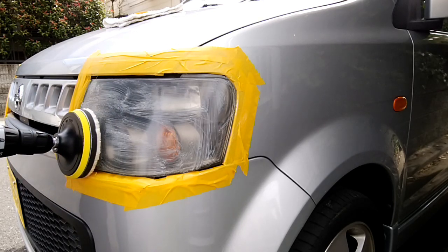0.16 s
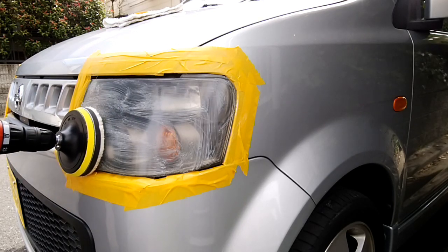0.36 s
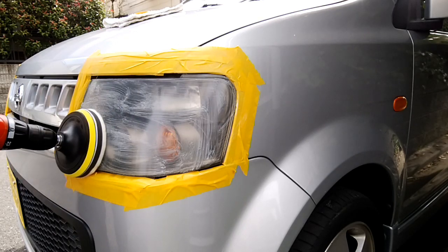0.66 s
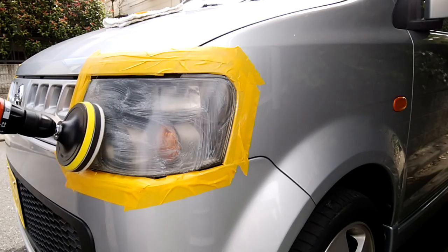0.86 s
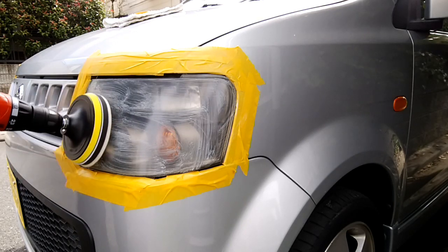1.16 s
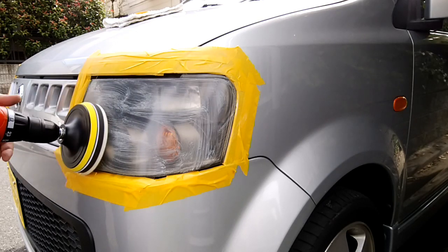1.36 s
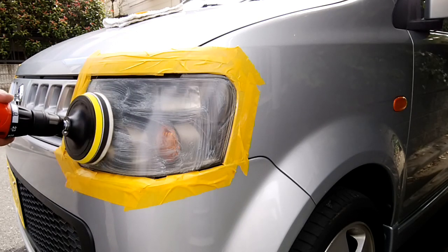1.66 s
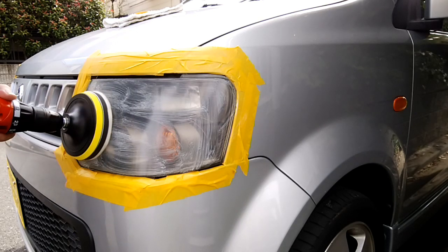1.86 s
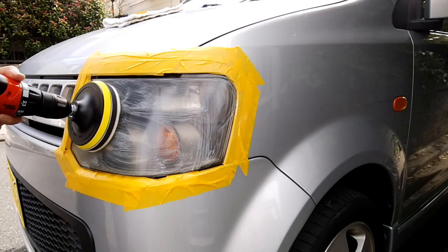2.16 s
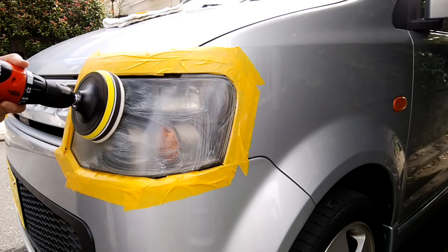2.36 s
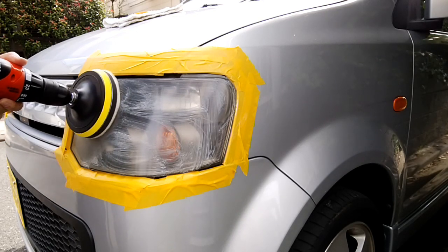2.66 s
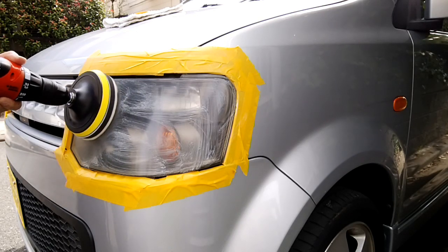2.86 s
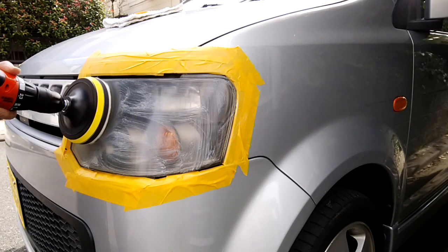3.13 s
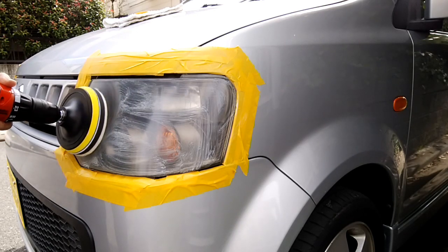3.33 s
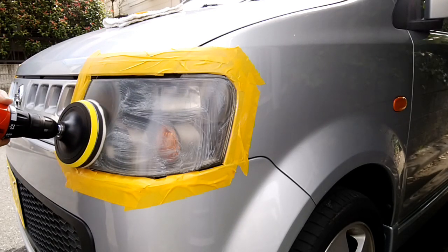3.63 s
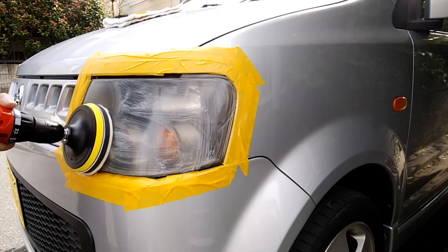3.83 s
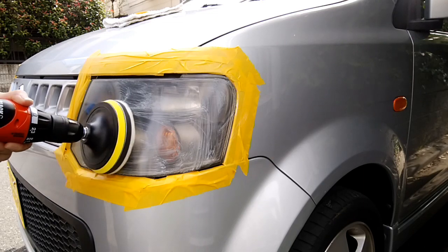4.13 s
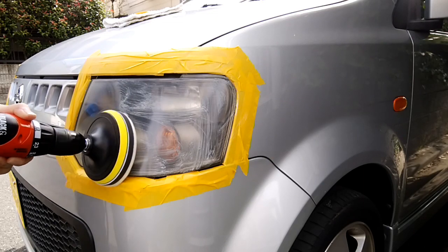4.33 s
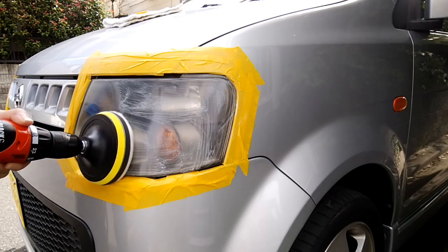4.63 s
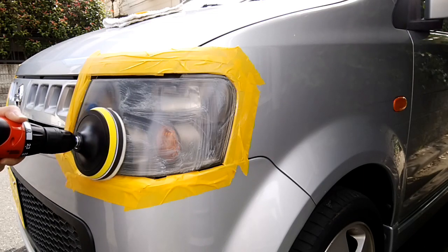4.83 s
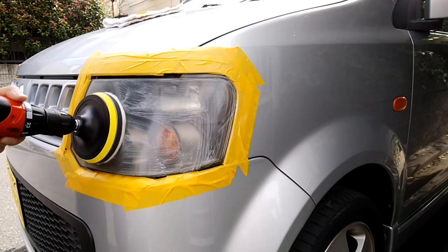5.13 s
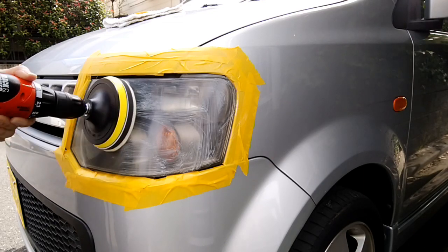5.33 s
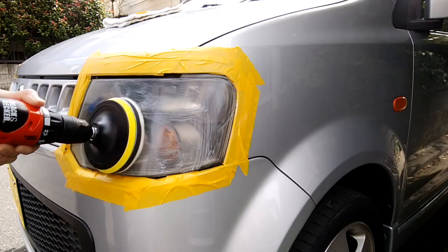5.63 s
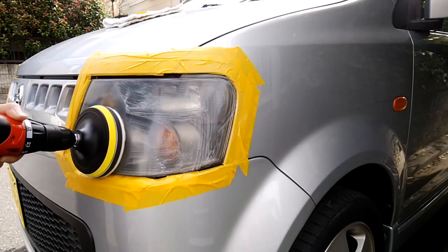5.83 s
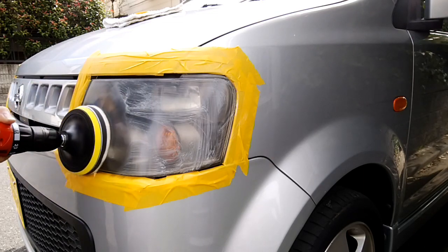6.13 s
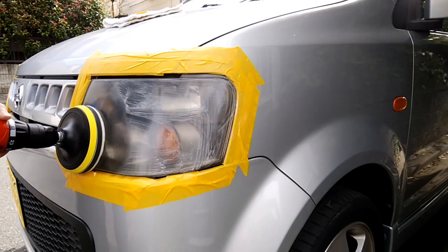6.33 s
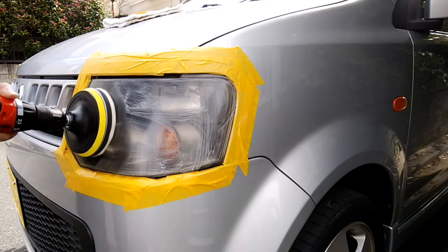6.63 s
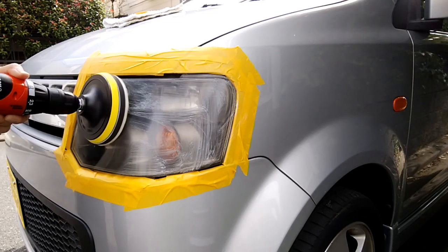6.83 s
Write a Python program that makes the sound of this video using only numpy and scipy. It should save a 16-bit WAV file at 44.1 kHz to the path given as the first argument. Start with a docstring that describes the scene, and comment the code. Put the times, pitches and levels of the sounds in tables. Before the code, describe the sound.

Close to a car in a quiet yard, a small bird whistles thinly and a faint tick is heard. A dull plastic trigger knock follows, then the drill creeps and quickly runs up to a bright, rattling whine. Foam hisses against the headlight, pulsing with each pad turn. The pitch settles slightly lower as the pad drags, and the motor keeps running to the end. Close microphone, same in both channels.

```python
"""Outdoors in a yard, close to a car: a cordless drill turns a foam polishing pad on a plastic headlight.
A small bird whistles (gliding tones), something ticks (a noise burst), the trigger knocks (decaying handle modes).
The motor creeps, runs up and labours under the pad: its angle drives whining, rattling gears, which throb once
per pad turn. Shaped noise makes the rubbing foam, ringing chuck, brushes and fan; a tone at motor speed, the hum."""
import sys
import numpy as np
from scipy import signal
from scipy.fft import rfft, irfft, next_fast_len
from scipy.io import wavfile
from scipy.ndimage import uniform_filter1d, map_coordinates

SR = 44100
rng = np.random.default_rng(int(sys.argv[2]) if len(sys.argv) > 2 else 0)


def put_to_file(sound):
    """Save the sound as 16-bit audio at rate SR, in the file named by the first command-line argument."""
    columns = np.atleast_2d(sound).T  # one column per channel
    safe = np.clip(columns, -1, 1)
    whole_steps = np.round(safe * 32767)
    wavfile.write(sys.argv[1], SR, whole_steps.astype(np.int16))


N = 308114
TIME = np.arange(N) / SR

MESH_ORDER = 1 / .1762  # tooth meshes per motor turn
USUAL_HZ = 345  # motor speed at which the levels of the parts hold
FULL_TRIGGER_S = .655

# working speed of the motor, sinking as the pad drags: t/s, f/Hz (turns per second)
WORKING_SPEED = [(1.0, 404), (1.15, 415), (1.45, 401), (1.85, 397), (2.1, 369), (2.6, 364), (2.68, 352),
                 (3.0, 351), (3.7, 335), (4.13, 339), (4.2, 327), (4.75, 332), (5.33, 350), (5.57, 336),
                 (5.76, 346), (6.2, 342), (6.38, 334), (6.99, 333)]
# how hard the hand presses the pad on: t/s, level/dB
HAND_PRESSURE = [(.8, -2.5), (1.0, 0), (1.2, -1.1), (1.65, -0.9), (2.1, -0.1), (3.3, 0.5), (3.9, 0.3),
                 (4.35, -0.5), (4.85, 1), (5.25, 0.9), (5.55, -1), (5.75, 1.5), (5.9, -0.8), (6.05, -3),
                 (6.5, -3), (6.99, -8)]
# treble of brushes, fan and rubbing, lower in the last two seconds: t/s, level/dB
TREBLE_LEVEL = [(2, 1), (3.05, 2), (3.7, 1.5), (4.5, 1.2), (4.9, 1), (5.05, -5.3), (5.28, -5.5), (5.52, -2),
                (5.75, -4), (6.1, -5), (6.99, -4.5)]


def undb(db):
    """Decibel definition: amplitude ratio 10^(dB/20)."""
    return 10 ** (np.asarray(db) / 20)


def unit(x):
    """Normalization by the root mean square, to rms 1."""
    return x / np.sqrt(np.mean(x ** 2))


def curve(table, order=1):
    """Linear interpolation in time of one column of a table."""
    rows = np.array(table)
    return np.interp(TIME, rows[:, 0], rows[:, order])


def noise():
    """White Gaussian noise: equal mean power at all frequencies."""
    return rng.standard_normal(N)


def walk(rate):
    """Low-pass random modulation: about `rate` smoothed changes a second, rms 1."""
    k = max(int(SR / rate), 2)
    steps = np.repeat(rng.standard_normal(N // k + 1), k)
    return unit(uniform_filter1d(steps, k)[:N])


def ring(hz, centre, width):
    """Lorentzian resonance: 1 at its centre, one half at half the width away, 0 far off."""
    return 1 / (1 + (2 * (hz - centre) / width) ** 2)


def colour(x, spectrum, modes=()):
    """Linear filtering: a broad spectral envelope with resonances on top, scaled to rms 1."""
    size = next_fast_len(N)
    f = np.arange(size // 2 + 1) * SR / size + 1  # 1 Hz up, to keep the logarithm finite
    hz, db = np.transpose(spectrum)
    shape = np.interp(np.log(f), np.log(hz), db)
    for centre, width, lift in modes:
        shape = shape + lift * ring(f, centre, width)
    return unit(irfft(rfft(x, size) * undb(shape), size)[:N])


def cycle(turns):
    """Harmonic oscillation: cosine of a phase given in turns."""
    return np.cos(2 * np.pi * turns)


def impacts(turns):
    """Impulsive excitation: one click of random strength and sign per turn, rms 1."""
    at = np.flatnonzero(np.diff(np.floor(turns)) > 0)
    clicks = np.zeros(N)
    clicks[at] = rng.standard_normal(len(at))
    return unit(clicks)


def fade(start, decay):
    """Exponential decay: an envelope that starts at once and dies away."""
    return (TIME >= start) * np.exp(-np.maximum(TIME - start, 0) / decay)


def scatter(x, decay):
    """Diffuse reflection: convolution with a short, decaying noise tail."""
    tail = rng.standard_normal(SR // 2) * np.exp(-TIME[:SR // 2] / decay)
    return signal.fftconvolve(x, tail / np.linalg.norm(tail))[:N]


def outdoors():
    """Turbulent pressure: quiet open air as shaped noise, with a few low buffets on the microphone."""
    # open air: f/Hz, relative level/dB per Hz
    air = [(25, -41), (50, -6), (100, 3), (170, -10.5), (340, -11), (900, -21), (2000, -31.5), (4000, -38),
           (5600, -38), (6600, -32), (7900, -40), (9400, -37), (13200, -36), (15500, -40)]
    # buffets of air on the microphone: t/s, length/s, level/dB
    buffets = [(0.708, 0.049, -38), (0.9, 0.082, -36.5), (2.402, 0.2, -48), (3.563, 0.036, -35),
               (3.732, .05, -40)]
    # rumble of a buffet: f/Hz, relative level/dB per Hz
    rumble = [(15, -55), (30, -31), (45, -15), (65, -3), (82, 3), (102, 4), (135, -11), (200, -14),
              (400, -15), (1500, -55)]
    air_db = -53.5
    gusts = sum(undb(db) * np.exp(-((TIME - at) / length) ** 2) for at, length, db in buffets)
    return undb(air_db + walk(5)) * colour(noise(), air) + gusts * colour(noise(), rumble)


def bird():
    """Frequency modulation: thin, gliding, wavering whistles with an octave, scattered by a hedge."""
    # notes: start t/s, end t/s, start f/Hz, end f/Hz, level/dB
    notes = [(-.06, 0.13, 4450, 4360, -58.5), (.12, 0.29, 4690, 4730, -59)]
    octave_db, hedge_db, hedge_decay_s = -20, -3.5, .03
    out = np.zeros(N)
    for start, end, from_hz, to_hz, db in notes:
        along = np.clip((TIME - start) / (end - start), 0, 1)
        turns = np.cumsum(from_hz + (to_hz - from_hz) * along) / SR
        turns = turns + .17 * walk(400)
        envelope = np.sin(np.pi * along) * (1 + 0.54 * walk(152))
        whistle = cycle(turns) + undb(octave_db) * cycle(2 * turns)
        out += undb(db) * envelope * whistle
    return out + undb(hedge_db) * scatter(out, hedge_decay_s)


def tick():
    """Transient: one faint, bright noise burst with exponential decay, before the drill starts."""
    # f/Hz, relative level/dB per Hz
    tick_band = [(4500, -25), (6000, 0), (7200, 0), (8000, -7), (9300, -3), (11000, -10), (15000, -16)]
    start_s, decay_s, level_db = .163, .012, -54
    return undb(level_db) * fade(start_s, decay_s) * colour(noise(), tick_band)


def trigger():
    """Modal excitation: a dull plastic knock rings the handle and leaves a diffuse echo in the yard."""
    # knock and its rebounds: t/s, peak level/dB before colouring
    knocks = [(0.3162, -15.5), (0.3175, -24), (0.325, -30), (.3342, -28)]
    # modes of the drill handle: f/Hz, relative level/dB, t60/s
    handle_modes = [(457, -20, 0.11), (610, -11, 0.083), (760, -1, 0.0097), (1100, 8, 0.017),
                    (1440, -2, 0.019), (2780, -8, 0.038)]
    # colouring of the knock: f/Hz, relative level/dB
    knock_colour = [(150, -26), (450, 9), (1600, 1), (2200, -12), (4500, -14), (7000, 7), (14000, -1)]
    # echo from the yard: f/Hz, relative level/dB per Hz
    yard = [(150, -20), (400, 7), (1500, -3), (2300, -15), (5000, -26), (7000, -22), (14000, -27)]
    yard_db, yard_decay_s = -45.5, 0.067
    out = np.zeros(N)
    for start, db in knocks:
        age = np.maximum(TIME[:SR] - start, 0)
        ringing = 0
        for hz, gain, t60 in handle_modes:
            ringing = ringing + undb(gain - 60 * age / t60) * np.sin(2 * np.pi * hz * age)
        out[:SR] -= undb(db) * ringing / np.abs(ringing).max()
    out = colour(out, knock_colour) * out.std()  # new spectrum, same overall level
    echo = undb(yard_db) * fade(knocks[0][0], yard_decay_s) * colour(noise(), yard)
    return out + echo


def motor_speed():
    """Relaxation to equilibrium: creep on a half-pulled trigger, then a quick run-up to working speed."""
    creep_hz, run_up_s, shape = 115, .08, .65  # stretched exponential
    age = np.maximum(TIME - FULL_TRIGGER_S, 0)
    remaining = np.exp(-(age / run_up_s) ** shape)
    return curve(WORKING_SPEED) + (creep_hz - curve(WORKING_SPEED)) * remaining


def grip():
    """Dry friction: brief grabs (+) and skips (-) of the pad, in dB."""
    # t/s, length/s, level/dB
    grips = [(0.75, .018, 2), (0.865, .024, 2.8), (0.922, 0.025, -3.5), (1.073, 0.031, -8),
             (1.592, 0.027, -8.5)]
    return sum(db * np.exp(-((TIME - at) / length) ** 2) for at, length, db in grips)


def pressure():
    """Normal force of the pad on the lens, in dB: the hand's push, with the grabs and skips."""
    return curve(HAND_PRESSURE) + grip()


def work_db(part, lag=.037):
    """Power-law radiation: one part's level in dB, from creep and run-up to speed and pad pressure."""
    engage_s, surge_decay_s = .009, 0.13  # the extra torque fades as the pad gathers speed
    db, creep_db, surge_db, per_speed, per_pressure = part
    age = TIME - FULL_TRIGGER_S - lag
    engaged = (1 + np.tanh(age / engage_s / 2)) / 2
    surge = engaged * np.exp(-np.maximum(age, 0) / surge_decay_s)
    speed_db = 20 * np.log10(curve(WORKING_SPEED) / USUAL_HZ)
    start_db = creep_db * (1 - engaged) + surge_db * surge
    return db + start_db + per_speed * speed_db + per_pressure * pressure()


# In each "part" below the columns are: level/dB, change while creeping/dB, lift in the run-up/dB,
# power of the speed, share of the pressure (dB per dB)


def slack_clunk():
    """Impact of backlash: a swell of noise as the gears take up their slack when the motor starts."""
    # f/Hz, relative level/dB per Hz
    clunk_band = [(60, -13), (130, -9), (180, -2), (260, -10), (350, -3), (480, -8), (620, -3), (800, -15),
                  (1400, -15), (3000, -46)]
    envelope = np.exp(-np.abs(TIME - .555) / 0.15)
    return undb(-32.5) * envelope * colour(noise(), clunk_band)


def rotor_hum(turns):
    """Centrifugal unbalance: a force once per motor turn, as the square of the speed, shakes the housing."""
    # strength of the hum, on top of the speed law: t/s, level/dB
    hum_level = [(.6, -42), (.78, -37.5), (1, -52), (1.6, -52), (2.3, -37), (2.9, -35.5), (3.5, -34),
                 (4.45, -41.5), (4.75, -34), (4.92, -30), (5.27, -31.5), (5.5, -41), (5.8, -30.5),
                 (6.02, -31.5), (6.25, -29), (6.6, -27), (6.99, -40.5)]
    unbalance = unit(motor_speed() ** 2)
    tone = np.sqrt(2) * cycle(turns + 0.1 * walk(40))
    return unbalance * tone * undb(curve(hum_level) + 2.35 * walk(22))


def fan():
    """Aerodynamic noise: turbulent air blown through the vents."""
    # f/Hz, relative level/dB per Hz
    fan_band = [(5000, -27.5), (5950, -32), (6250, 0.5), (6800, 1.5), (7100, -7), (7500, -15), (9000, -47)]
    fan_part = (-27, -19, -3, 1.2, 0.35)
    level_db = work_db(fan_part) + 1.1 * curve(TREBLE_LEVEL)
    return colour(noise(), fan_band) * undb(level_db + 1.3 * walk(70))


def brushes(turns, load):
    """Sliding friction: brush hiss, modulated by the passing commutator bars and by each motor turn."""
    # f/Hz, relative level/dB per Hz
    brush_band = [(1500, -23.5), (4500, -10), (7400, -7), (8000, -13.5), (9300, -10), (10300, -14.5),
                  (10800, -18.5), (11500, -16), (12300, -12.5), (13200, -9), (14300, -21.5), (15700, -20)]
    # resonances: f/Hz, width/Hz, lift/dB
    brush_modes = [(8450, 910, 5), (13120, 920, 5.8)]
    brush_part = (-26, -16.5, 0, -0.26, 0.08)
    commutator_bars = 6
    scrape = noise() * (1 + 0.057 * cycle(commutator_bars * turns) + 0.12 * cycle(turns))
    level_db = work_db(brush_part) + curve(TREBLE_LEVEL) + 0.033 * load
    return colour(scrape, brush_band, brush_modes) * undb(level_db + 0.75 * walk(120))


def pad(turns, speed, load):
    """Stick-slip friction: foam on the lens makes a dense stream of tiny releases, which ring the chuck."""
    # rubbing on the lens: f/Hz, relative level/dB per Hz
    lens = [(500, -25), (1600, -4.5), (2300, 0), (2800, 1), (3600, 1), (4100, -1.5), (4600, -9), (5200, -6),
            (6500, -40), (12000, -50)]
    # resonances of the lens: f/Hz, width/Hz, lift/dB
    lens_modes = [(2930, 130, 2.4), (3440, 160, 3.6)]
    # ringing chuck: f/Hz, relative level/dB per Hz
    chuck_band = [(4800, -51), (5350, -13), (5560, 5), (5820, -1.5), (6050, 3), (7000, -42)]
    rub_part, chuck_part = (-24.5, -18, 5, 0.4, 1.5), (-34, -11, 4, 0, 0.9)
    chuck_hz, chuck_width_hz, chuck_lift_db = 5515, 660, 4.5
    bite_share, bite_per_db = 0.023, 0.1868  # share of the load swing; its rise per dB of lighter pressure
    drag_db = (bite_share - bite_per_db * curve(HAND_PRESSURE)) * load
    slips = noise() * undb(1.05 * walk(1500) + 1.2 * walk(150)) * (1 + 0.13 * cycle(turns))
    # the rubbing follows a share of the treble's level
    rub_db = work_db(rub_part) + 0.34 * curve(TREBLE_LEVEL) + drag_db
    rub = colour(slips, lens, lens_modes) * undb(rub_db + 1.0 * walk(35))
    # the chuck rings most when the third multiple of the mesh meets its resonance
    lift_db = chuck_lift_db * ring(3 * MESH_ORDER * speed, chuck_hz, chuck_width_hz)
    chuck_db = work_db(chuck_part) + lift_db + drag_db
    chuck = colour(slips, chuck_band) * undb(chuck_db + 1.5 * walk(40))
    return rub + chuck


def gears(turns, speed, load):
    """Parametric excitation: meshing teeth sing and knock in the gearbox, harder when the pad drags."""
    # strength of the whine: t/s, level/dB
    whine_level = [(1, 1.5), (2.4, -2), (3.2, -0.5), (4.3, 1), (4.85, -3), (5.3, 3), (5.85, 0.5), (6.5, -1),
                   (6.99, -3.5)]
    # weaker motor and gear tones: multiple of the motor speed, relative level/dB
    weak_orders = [(.75, -48), (2.293, -44), (3, -42), (3.67, -40.5), (4.54, -41.5), (6.82, -41.5),
                   (8.1, -41.5), (8.6, -40.5), (9.08, -47), (10.2, -52)]
    # gearbox: f/Hz, relative level/dB per Hz
    gearbox = [(60, -39), (200, -59), (255, -5.5), (420, -5.5), (540, -11), (700, -4), (900, -1),
               (1200, -6), (1700, -1.5), (2200, -1.5), (2700, -5.5), (5000, -19)]
    # resonances of the gearbox: f/Hz, width/Hz, lift/dB
    gearbox_modes = [(306, 49, 1.7), (1037, 104, 8.5), (1302, 32, 6.5), (1485, 250, 11.9), (1646, 120, 4.3)]
    mesh_part, octave_part, rattle_part = (-27.5, -26, -2, 5.4, 0.28), (-31, -40, -3, 0.8, 0.1), (-24.5, -10, 5.5, 0.7, 0.68)
    case_hz, case_width_hz, case_lift_db = 3710, 81, 3.5  # upper ring of the gear case
    tooth_ring_hz, tooth_ring_width_hz, tooth_lift_db = 920, 41, 11  # its lower ring
    mesh_db_per_hz, rattle_db_per_hz = 0.18, 0.05  # torque slows the motor and drives the teeth harder
    slowed_hz = USUAL_HZ - curve(WORKING_SPEED)

    # the mesh is least regular while the pad gathers speed
    run_up = np.exp(-((TIME - .8) / 0.15) ** 2)
    mesh = turns * MESH_ORDER + (.04 + .18 * run_up) * walk(90) + .035 * walk(500)
    whine_db = work_db(mesh_part) + curve(whine_level) + mesh_db_per_hz * slowed_hz
    whine_db = whine_db + 1.2 * grip()  # a grab drives the teeth harder
    tone = undb(whine_db + load + 2.04 * walk(130)) * cycle(mesh)

    # the octave of the whine swells near the upper ring
    case_db = case_lift_db * ring(2 * MESH_ORDER * speed, case_hz, case_width_hz)
    octave_db = work_db(octave_part) + case_db + 0.032 * load
    backlash = .085 * walk(130)
    octave = undb(octave_db + 3.64 * walk(90)) * cycle(2 * mesh + backlash)

    # each weak tone swells while its pitch crosses the lower ring
    others = 0
    for order, db in weak_orders:
        lift_db = tooth_lift_db * ring(order * speed, tooth_ring_hz, tooth_ring_width_hz)
        wobbling = cycle(order * turns + 0.15 * walk(60))
        others = others + undb(db + lift_db + 2.96 * walk(35)) * wobbling

    # after the full pull the rattle comes up sooner than the other parts
    effort = undb(work_db(rattle_part, lag=0.0095) + rattle_db_per_hz * slowed_hz)
    knocks = impacts(mesh) * (1 + 0.085 * cycle(turns))
    rattle = colour(knocks, gearbox, gearbox_modes) * undb(0.045 * load + 1.2 * walk(30))
    tones = tone + octave + others * unit(effort * speed ** 2)
    return np.sqrt(2) * tones + effort * rattle


def wing_echo(x):
    """Comb filtering: the curved car wing mirrors the treble; as the hand moves, the ripples slide."""
    echo_s, echo_share = .0042, .28  # mean delay, amplitude share
    high_pass = signal.butter(2, 1800, "high", fs=SR, output="sos")
    treble = signal.sosfilt(high_pass, x)
    lag = echo_s * (1 + 0.033 * walk(2)) * SR  # in samples
    return x + echo_share * map_coordinates(treble, [np.arange(N) - lag], order=3)


def drill():
    """Coupled rotation: the pad slows the motor once a pad turn; its angle drives gears, pad, brushes, hum."""
    # where the pad bears hardest as the hand tilts it: t/s, angle/pad turns, scale of the load swing/dB
    tilt = [(0.85, 0.04, 1.1), (1.1, 0.82, 10.6), (1.25, 0.45, 3.1), (1.55, 0.43, 7.4), (2.0, 0.42, 0.9),
            (2.15, 0.85, 3.3), (2.95, 0.85, 4.4), (3.15, 1.45, 3.6), (4.2, 1.36, 3.9), (4.85, 1.24, 0.2),
            (5.4, 1.43, 5.4), (5.8, 1.46, 2.8), (6.4, 1.53, 7.3), (6.99, 1.2, 3.2)]
    start_s, gear_ratio = .523, 42.4
    # a fast, lightly loaded motor yields most
    sag_hz_per_db, sag_at_hz, sag_power = 1.5, 400, 4
    grip_hz_per_db = 1.4  # a grab slows the motor, a skip frees it
    steady = motor_speed()
    pad_angle = np.cumsum(steady) / SR / gear_ratio - curve(tilt)
    swing = curve(tilt, order=2)
    load = swing * (0.85 * cycle(pad_angle) - 0.13 * cycle(2 * pad_angle))
    sag = sag_hz_per_db * swing * (steady / sag_at_hz) ** sag_power
    speed = steady - sag * np.sin(2 * np.pi * pad_angle) - grip_hz_per_db * grip()
    turns = np.cumsum(speed) / SR
    running = np.clip((TIME - start_s) / 0.037, 0, 1)
    # the fan and the clunk are shaped noise, free of the angle
    motor = brushes(turns, load) + fan() + rotor_hum(turns) + slack_clunk()
    return running * (gears(turns, speed, load) + wing_echo(pad(turns, speed, load) + motor))


def scene():
    """Superposition of pressures: all sources add at one microphone, which feeds both channels."""
    mono = outdoors() + bird() + tick() + trigger() + drill()
    return np.array([mono, mono])


def record(dry):
    """Saturation and band limiting: the recorder rounds the highest peaks and cuts the top."""
    ceiling, top_hz = .7, 15750
    rounded = dry / (1 + (dry / ceiling) ** 4) ** (1 / 4)
    low_pass = signal.ellip(10, .05, 70, top_hz, fs=SR, output="sos")
    return signal.sosfiltfilt(low_pass, rounded)


dry = scene()
out = record(dry)
put_to_file(out)
```